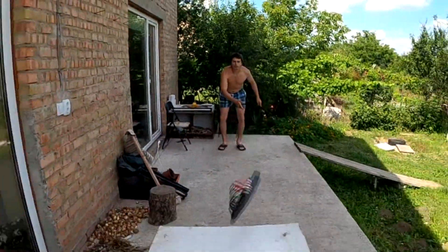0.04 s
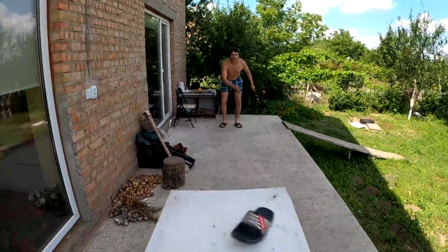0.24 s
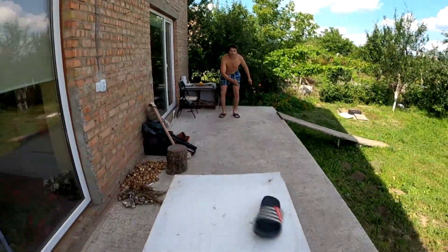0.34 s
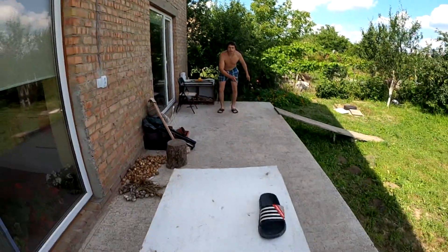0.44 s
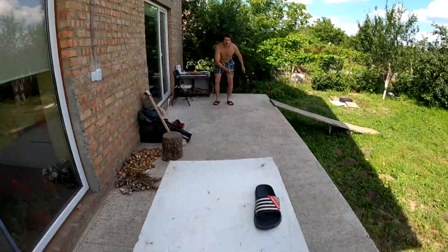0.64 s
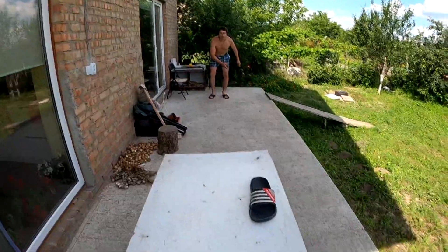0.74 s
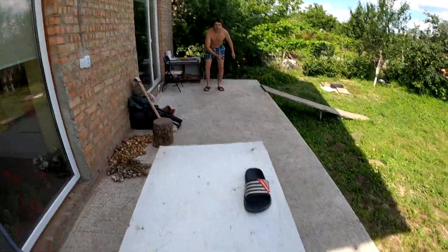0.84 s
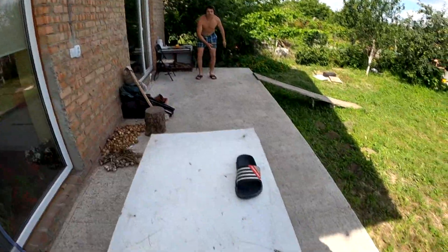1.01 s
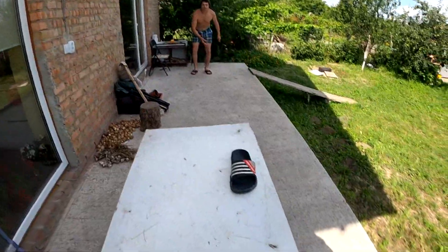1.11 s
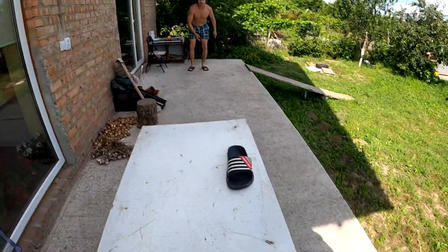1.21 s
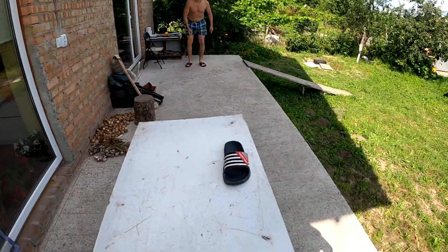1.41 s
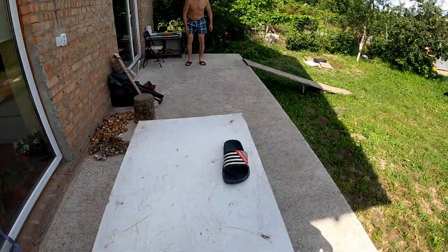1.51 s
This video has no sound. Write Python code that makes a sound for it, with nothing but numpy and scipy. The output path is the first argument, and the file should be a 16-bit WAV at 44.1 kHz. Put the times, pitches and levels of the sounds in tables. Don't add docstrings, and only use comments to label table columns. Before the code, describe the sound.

A rubber sandal lands on a thin board, close and dry. Faint garden air, hollow and grainy as if slowed, leads through tiny ticks to a loud double slap at 0.23-0.26 s with a short woody knock. Skids fade; a weaker bounce comes at 0.42, last ticks by 0.5. A dull casing tap at 0.81, faint chirp near 0.98, wavering distant hum and slight leaf rustles follow over low wind.

```python
import sys
import numpy as np
from scipy import signal
from scipy.fft import rfft, irfft
from scipy.io import wavfile

SR = 44100
rng = np.random.default_rng(int(sys.argv[2]) if len(sys.argv) > 2 else 0)


def generate_wav(sig):
    pcm = np.round(np.clip(np.atleast_2d(sig).T, -1, 1) * 32767).astype(np.int16)
    wavfile.write(sys.argv[1], SR, pcm)


def volts(x):
    e = np.asarray(x, float) / 20
    return 10 ** e


N = 68355
T = np.arange(N) / SR


def rms_one(x):
    return x / np.sqrt(np.mean(x ** 2) + 1e-20)


def ring(x, hz, t60):
    radius, w = volts(-60 / (max(t60, .001) * SR)), 2 * np.pi * hz / SR
    return signal.lfilter([0, np.sin(w)], [1, -2 * radius * np.cos(w), radius ** 2], x + 1e-18)


def low(x, hz, order=2):
    return signal.sosfilt(signal.butter(order, hz, fs=SR, output="sos"), x)


def high(x, hz, order):
    return signal.sosfilt(signal.butter(order, hz, "high", fs=SR, output="sos"), x)


def coloured(points, tilt_db=0, size=N):
    hz = np.maximum(np.fft.rfftfreq(size, 1 / SR), 1)
    p = np.array(points, float)
    db = np.interp(np.log(hz), np.log(p[:, 0]), p[:, 1]) + tilt_db * np.log2(hz / 2000)
    return rms_one(irfft(rfft(rng.standard_normal(size)) * volts(db), size))


def slow_noise(hz, order=2):
    return rms_one(low(rng.standard_normal(2 * N), hz, order)[N:])


def bell(centre, length):
    return np.exp(-.5 * ((T - centre) / length) ** 2)


# frequency in Hz, level in dB per Hz.
AIR = [(40, 3.5), (435, -8.5), (691, -10), (1620, -15.5), (2700, -21.5), (5500, -27.5), (8500, -26.5),
       (13500, -50.5)]


def garden_air():
    return volts(-63) * coloured(AIR)


def wind_rumble():
    gust_db, calm_db = 3.5, -11
    calm = np.clip(3 - 10 * T, 0, 1)
    gust = volts(gust_db * slow_noise(4.2) + calm_db * calm)
    return low(volts(-58) * gust * slow_noise(30, order=1), 60)


# time in seconds, frequency in Hz, rms level in dB.
HUM = [
    (.55, 1670, -84),
    (.75, 1660, -79),
    (.89, 1670, -77),
    (.95, 1660, -90),
    (1.12, 1640, -88),
    (1.18, 1630, -75),
    (1.33, 1590, -76),
    (1.45, 1570, -83),
]


def far_hum():
    s, hz, db = np.transpose(HUM)
    level = volts(np.interp(T, s, db, left=-120, right=-120))
    waver = 1 + .25 * slow_noise(25)
    phase = 2 * np.pi * np.cumsum(np.interp(T, s, hz)) / SR
    return np.sqrt(2) * level * waver * np.sin(phase)


def tone_burst(s, length_s, hz, db):
    return volts(db) * bell(s, length_s) * np.sin(2 * np.pi * hz * T)


def wind_and_bird():
    thump = tone_burst(.085, .025, 60.6, -56)
    puff = tone_burst(.635, .0064, 65, -57)
    chirp = tone_burst(.975, .011, 2864, -74.5)
    return thump + puff + chirp


# centre in seconds, Gaussian length in seconds, level in dB, frequency in Hz.
RUSTLES = [
    (.91, .006, -78, 7000),
    (1.10, .015, -72, 1500),
    (1.127, .006, -76, 6000),
    (1.335, .006, -77, 6500),
    (1.52, .012, -79, 8000),
]


def leaves():
    friction = rng.standard_normal(N)
    out = np.zeros(N)
    for s, length, db, hz in RUSTLES:
        out += volts(db) * bell(s, length) * rms_one(ring(friction, hz, 6 / hz))
    return out


# frequency in Hz, level in dB, decay t60 in seconds.
BUMP_RINGS = [
    (1500, -53, 0.022),
    (2110, -50.5, 0.019),
]


def bump():
    click = np.zeros(N)
    click[int(.8106 * SR)] = 1
    tick = low(click, 2600, order=4)
    push = np.roll(ring(click, 65.7, .011), 12)
    out = volts(-45.5) * tick / tick.max() - volts(-38) * push / push.max()
    for hz, db, t60 in BUMP_RINGS:
        out += volts(db) * ring(tick / tick.sum(), hz, t60)
    return out


def scatter(x):
    t60, cut_hz, first_return_s = .3, 2500, .0045
    t = T[:SR // 2]
    tail = low(rng.standard_normal(len(t)), cut_hz, order=1)
    tail *= volts(-60 * t / t60) * (t > first_return_s)
    return volts(-25) * signal.fftconvolve(x, tail / np.sqrt(np.sum(tail ** 2)))[:N]


# frequency in Hz, level in dB, decay t60 in seconds.
BOARD = [(108, -13, .12), (158, -17, 0.16), (195.1, -3, 0.076), (295, -11.5, 0.069), (358, -6, 0.026),
         (542, -14, .05), (777.6, -10.5, 0.022), (850, -6, 0.02), (1110, -10.5, .02), (1551, -8.5, 0.019),
         (1865, -8, 0.013), (2620, -11, 0.023), (3672, -6, .01), (5220, -14.5, .006)]


def board(force, offsets_db):
    out = np.zeros(len(force))
    for (hz, db, t60), offset in zip(BOARD, offsets_db):
        out += volts(db + offset) * ring(force, hz, t60)
    return out


# start in seconds, swell in seconds, rms level in dB,
# fade t60 in seconds, brightness in dB per octave.
SLAPS = [(.2335, .0005, -25, .02, 0.1), (.2362, .0008, -25, .018, 0.1), (.2392, .0008, -26, .025, 0.1),
         (.2478, .0032, -13, .022, 0.7), (.2512, .0015, -12, .014, -0.4), (.2545, .002, -27, .07, 0.1),
         (.2790, .003, -36, .05, -2.5), (.2880, .011, -34, .04, 0.1), (.3020, .004, -40, .08, -2.5),
         (.3220, .010, -47, .10, 0.1), (.3760, .014, -51, .12, -1.5), (.4175, .0015, -39, .06, -1.2),
         (.4220, .018, -47, .09, 2.6), (.4480, .003, -37, .028, 3.2), (.4680, .006, -52, .05, -0.5),
         (.5030, .002, -54, .12, -1.5)]
# frequency in Hz, level in dB per Hz.
SOLE = [(300, -8.5), (1200, -4), (2460, -1), (3440, 0), (4520, -10.5), (7200, -12), (9000, -18),
        (12000, -33.5), (14000, -41)]


def slaps():
    size = 8192
    out, t = np.zeros(N), np.arange(size) / SR
    for s, swell, db, t60, tilt_db in SLAPS:
        shape = np.where(t < swell, (t / swell) ** 0.67, volts(-60 * (t - swell) / t60))
        burst = shape * coloured(SOLE, tilt_db, size)
        burst *= np.sqrt(np.sum(shape ** 2) / np.sum(burst ** 2))
        i = int(s * SR)
        out[i:i + size] += volts(db) * burst
    return out + volts(-32.5) * board(out, np.zeros(len(BOARD)))


# start in seconds, peak level in dB, pitch of the rubber snap in Hz, board share in dB.
KNOCKS = [(.2337, -15, 1500, 3), (0.2358, -23.5, 3860, 1), (0.239, -7.5, 860, -4),
          (0.2485, -17.5, 804.5, 4), (0.2521, -10, 1500, -6), (0.257, -15, 790, -8.5),
          (0.2801, -29.5, 1500, -9.5), (0.297, -37, 3165, -30), (0.4175, -24, 2020, -3),
          (0.421, -28.5, 1500, -6), (.4490, -38, 530, 3.5), (.4760, -31, 2400, -17.5),
          (0.4797, -44.5, 300, -13), (0.5026, -32, 2810, -15), (0.5061, -44, 2800, -41)]


def knocks():
    strike_spread_db, snap_cycles, contact_ratio = 3, 4.9, 1.7
    out = np.zeros(N)
    click = np.eye(1, SR // 4)[0]
    edge = low(click, 5000)
    for s, db, snap_hz, board_db in KNOCKS:
        force = low(click, contact_ratio * snap_hz)
        body = board(force, strike_spread_db * rng.standard_normal(len(BOARD)))
        snap = ring(force, snap_hz, snap_cycles / snap_hz)
        knock = volts(board_db) * body / np.abs(body).max()
        knock += snap / snap.max() + volts(-8) * edge / edge.max()
        i = int(s * SR)
        out[i:i + len(knock)] -= volts(db) * knock
    return out


FORE_TICKS_DB = [
    -17,
    -19,
    -33.5,
]


def stretch(air, hits):
    grain_s, landing_s, end_s, feedback = .0079, .2332, .2, .55
    lag = int(grain_s * SR)
    combed = sum(feedback ** k * np.roll(air, k * lag) for k in range(16)) * np.sqrt(1 - feedback ** 2)
    normal = np.clip((T - end_s + .03) / .075, 0, 1)
    gate = (T > landing_s) * (T < landing_s + grain_s * .7)
    first = hits * gate * np.exp(-np.maximum(T - landing_s, 0) / .002)
    first = low(first, 8000, order=1)
    fore = sum(volts(db) * np.roll(first, -(k + 1) * lag) for k, db in enumerate(FORE_TICKS_DB))
    return normal * air + (1 - normal) * volts(-2.5) * combed + fore


def scene():
    hits = slaps() + knocks()
    hits = high(hits + scatter(hits), 110, order=3)
    far = wind_rumble() + far_hum() + wind_and_bird() + leaves()
    mid = stretch(garden_air(), hits) + far + bump() + hits
    side = volts(-35) * np.roll(mid - low(mid, 2400), 9)
    return np.array([mid + side, mid - side])


def band_limit(x):
    return signal.sosfilt(signal.butter(12, 14070, fs=SR, output="sos"), x)


def record(dry):
    port_hz, port_width_hz, port_lift, clip = 8400, 1200, 1.1, 3.6
    radius, w = np.exp(-np.pi * port_width_hz / SR), 2 * np.pi * port_hz / SR
    gain = (1 - radius ** 2) / 2
    port = signal.lfilter([gain, 0, -gain], [1, -2 * radius * np.cos(w), radius ** 2], dry)
    x = dry + port_lift * port
    x = clip * np.tanh(x / clip)
    x = signal.sosfilt(signal.cheby2(10, 50, 14350, fs=SR, output="sos"), x)
    return band_limit(x - .0013)


dry = scene()
out = record(dry)
generate_wav(out)
```